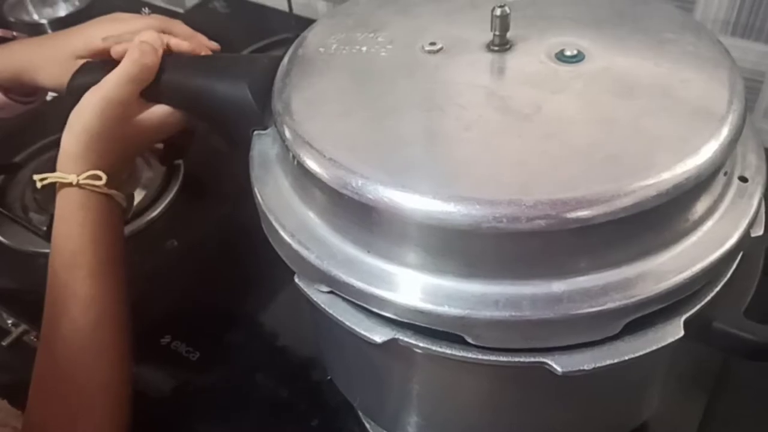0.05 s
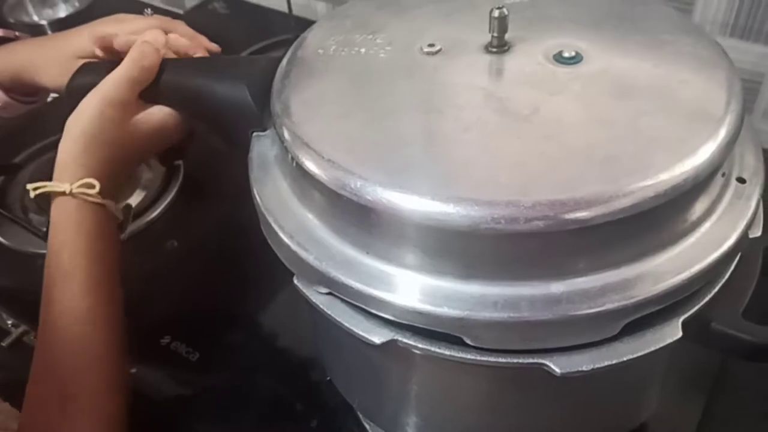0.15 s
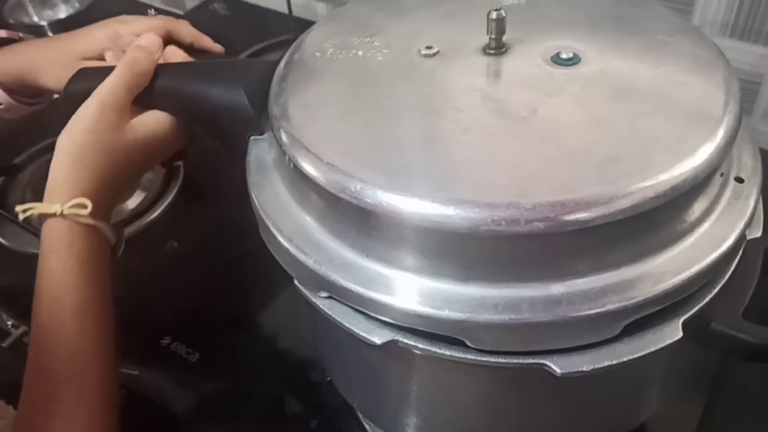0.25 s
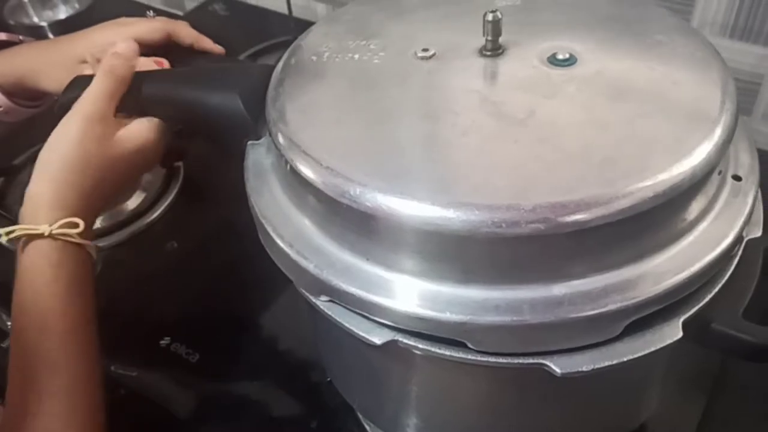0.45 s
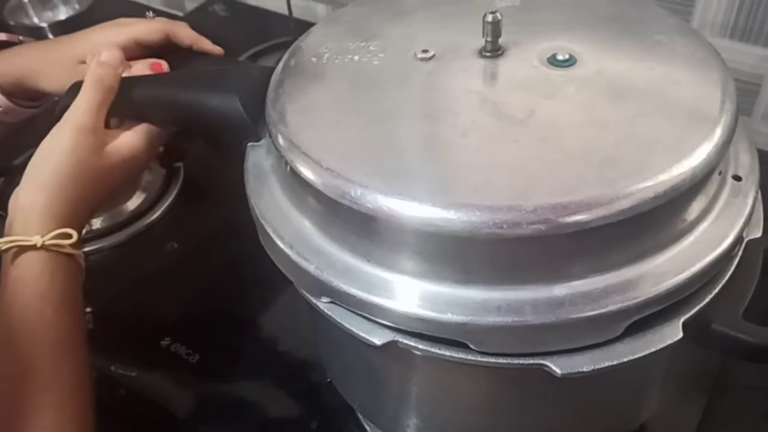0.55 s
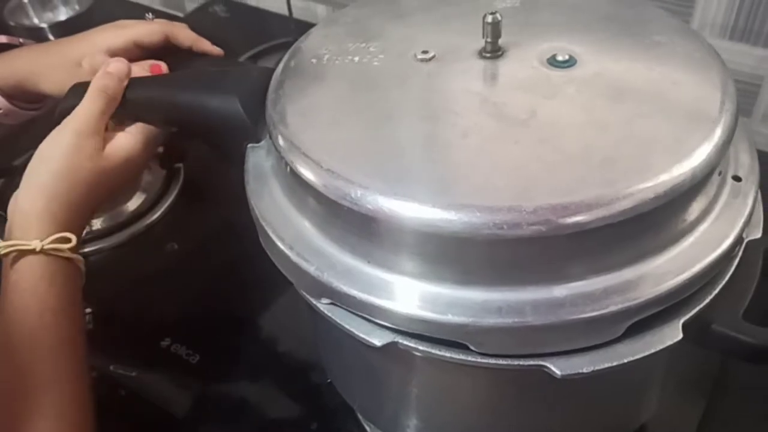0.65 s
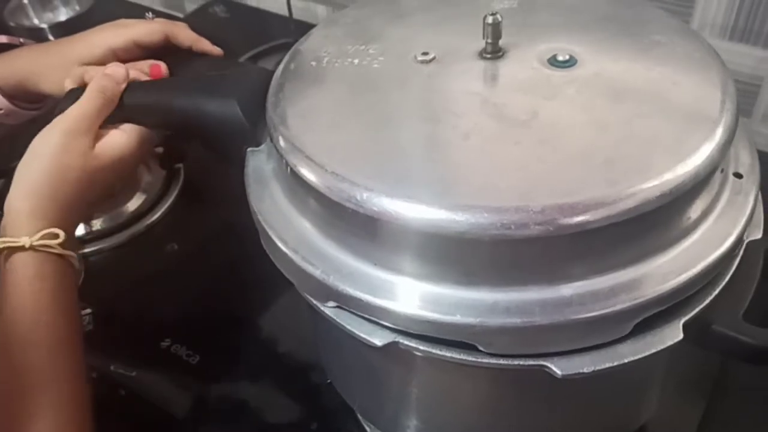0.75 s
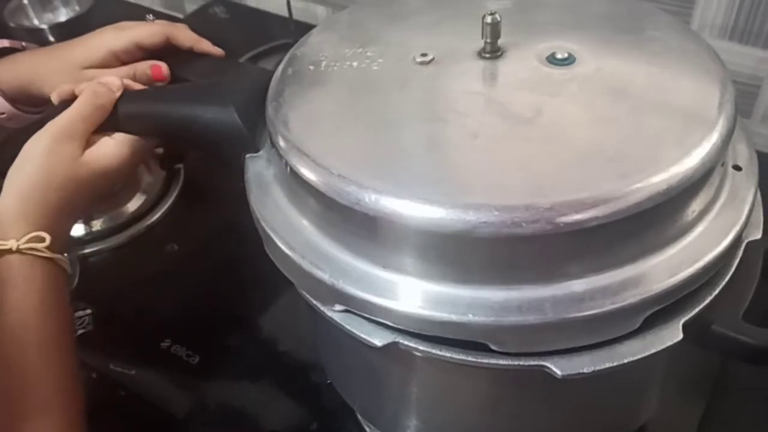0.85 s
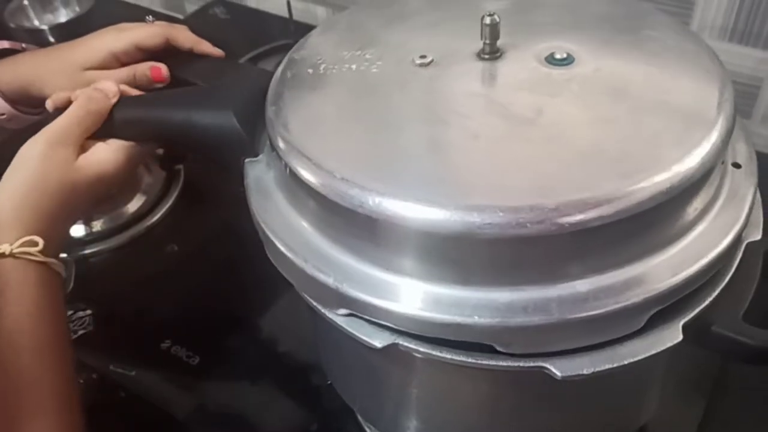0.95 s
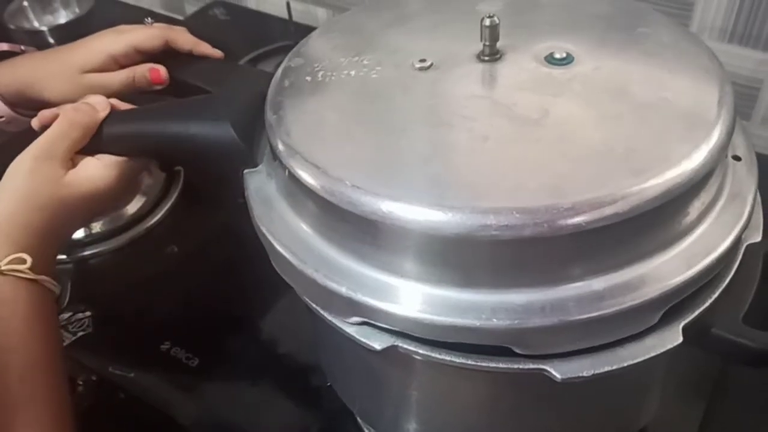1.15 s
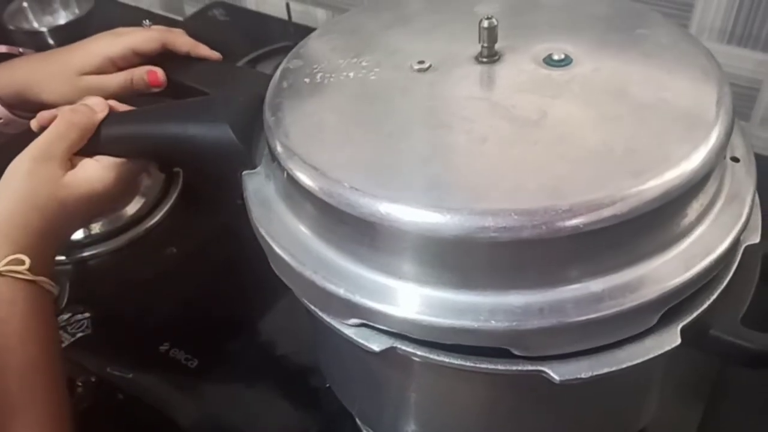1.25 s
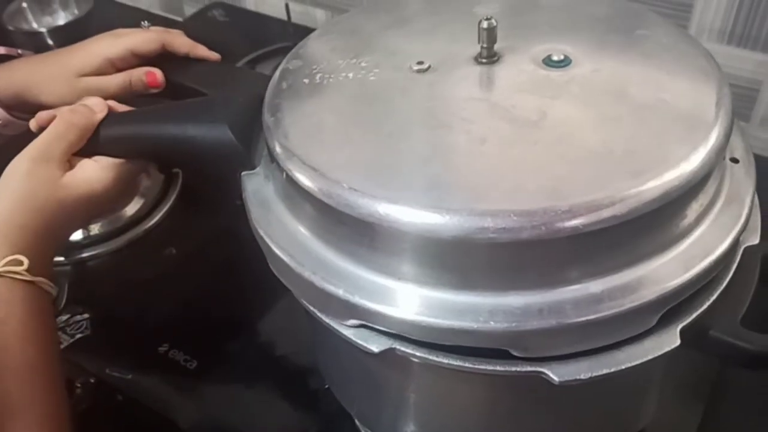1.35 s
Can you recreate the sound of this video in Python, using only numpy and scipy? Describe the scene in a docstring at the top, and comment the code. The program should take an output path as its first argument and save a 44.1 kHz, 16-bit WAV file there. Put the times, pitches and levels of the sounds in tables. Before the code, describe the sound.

A metal pressure cooker lid scrapes briefly and drops onto its pot with a loud, hollow clank. Faint rubbing, ticks and light knocks follow as it is twisted shut, heard close up in a small kitchen.

```python
"""A rim scrapes, then a loud clank: the aluminium lid of a pressure cooker drops into place on its pot.
As the lid is twisted shut, the gasket rubs, the lugs tick and knock, and the plastic handles meet.
Impacts and stick-slip friction excite the same resonator, the pot, which answers with a few hollow
low modes and a dense metallic shimmer that lingers in a small kitchen, over a faint steady hiss."""
import sys
import numpy as np
from scipy import signal
from scipy.fft import rfft, irfft
from scipy.io import wavfile

SR = 44100
rng = np.random.default_rng(int(sys.argv[2]) if len(sys.argv) > 2 else 0)


def file_out(sig):
    """Save sig as 16-bit WAV at sys.argv[1]."""
    # one column per channel
    cols = np.atleast_2d(sig).T
    # limit, then scale
    lim = np.clip(cols, -1, 1)
    pcm = np.round(lim * 32767).astype(np.int16)
    wavfile.write(sys.argv[1], SR, pcm)


N = 61739
T = np.arange(N) / SR

# The dense modes of pot and room. Each row: frequency in Hz, relative spectral level in dB, quick T60
# and lingering T60 in seconds, lingering share in dB, left minus right in dB, left-right correlation.
SHIMMER_BANDS = [(40, -36, 0.075, 0.27, -12, -4, 0.71), (122.4, -25.5, 0.09, 0.32, -16, 3, 0.47),
                 (210, 1.5, 0.5, 0.64, -9.5, 6.5, 1), (463, -5, 0.17, 0.66, -16, -2.5, 0.71),
                 (926, -4.5, .2, 0.77, -10, 0, 0.019), (2120, -17.5, 0.32, 0.99, -16, -1, 0),
                 (3740, -8, 0.24, 0.73, -12.5, -5, 0), (5090, -18, 0.064, 0.54, -16, 2.5, 0),
                 (7110, -4.5, 0.18, 0.42, -5.5, -6, 0.12), (8600, -16.5, 0.088, 0.22, -19, -0.5, 0.15),
                 (13100, -32.5, 0.15, .5, -10, -6.5, 0)]


def ringing(jerks):
    """Superposition of resonances: each distinct ring answers the contact force as a damped sinusoid."""
    # Modes of the closed pot and, last, a faint high ring at the lower edge of the treble notch.
    # Each row: frequency in Hz, relative level in dB, T60 in seconds, left minus right in dB.
    rings = [(173.2, -21.5, 0.5, -6), (207.3, -24.5, 0.89, 4), (259.1, -14, 0.33, -5),
             (275.8, -8.5, 0.15, 0.5), (312.2, -18, 0.35, 0), (398, -26.5, 0.3, 8), (454, -24, 0.25, 0.5),
             (479.4, -29.5, 0.34, -4.5), (650.4, -18.5, 0.12, 6), (849.7, -16, 0.22, 3.5),
             (872, -25.5, 0.27, 10), (911, -24, 0.23, 1), (1209, -23.5, 0.17, 8), (1227, -20.5, 0.19, 5.5),
             (1287.5, -25.5, 0.32, -8), (1449, -27.5, 0.18, -3.5), (2340, -29, 0.3, 2),
             (3013, -34.5, 0.4, 5.5), (3436, -28.5, 0.29, -14), (3667, -20.5, 0.18, -2),
             (4697, -26, 0.28, -1), (6170, -29.5, 0.22, -11), (6880, -28, 0.22, -12), (8470, -36, 0.21, -6)]
    seated_s, seated_loss_db, grip_hz = 0.91, 8, 1210  # pressed on the gasket, the lid loses upper modes
    waver_depth, waver_corner_hz = 0.8, 1470  # the loose lid makes the upper rings waver
    spread_rad, spread_hz = 1.38, 2350  # upper rings reach left and right out of step
    soft_jerks = jerks * from_db(-4)  # sliding excites these rings less than a blow does
    out = 0
    for k, (hz, db, t60, pan_db) in enumerate(rings):
        phase = (-1) ** k * np.array([[.5], [-.5]]) * spread_rad * min(hz / spread_hz, 1)
        build_up = 1 - np.exp(-T * hz)  # a blow takes about one cycle to spread round the rim
        ring = from_db(db) * np.sin(2 * np.pi * hz * T + phase) * dying(t60) * build_up
        grip = from_db(-seated_loss_db * (T > seated_s) * hz / (hz + grip_hz))
        unsteady = 1 + waver_depth * hz / (hz + waver_corner_hz) * waver()
        out = out + pan(pan_db) * unsteady * convolve(grip * contact_force(hz, soft_jerks), ring)
    radiation = signal.butter(2, 181, "high", fs=SR, output="sos")  # too small a pot for deep bass
    return signal.sosfilt(radiation, out)


def shimmer(jerks):
    """Modal overlap: countless close modes merge into noise with a crack, a quick decay and a long ring."""
    out = 0
    for hz, noise in noise_bands():
        db, quick_t60, slow_t60, slow_db, pan_db, _ = at_hz(SHIMMER_BANDS, hz)
        crack = from_db(1) * pan(-1) * dying(t60=0.072)  # direct sound of the touch
        decay = np.sqrt(crack ** 2 + dying(quick_t60) ** 2 + (from_db(slow_db) * dying(slow_t60)) ** 2)
        response = from_db(db - 43.5) * pan(pan_db) * noise * decay
        out = out + convolve(contact_force(hz, jerks), response)
    return out


def contact_force(hz, jerks):
    """Impact and friction: the drive at one frequency is the sliding rim plus an impulse per contact."""
    # Lid strikes pot. Each row: start in seconds, then boom, clank, ring and tick strengths in dB.
    contacts = [ (0.002, -35, -24, -32, -32), (0.092, -42, -23.5, -48, -55),
                (0.173, -23.5, -37, -43, -31.5), (0.205, -23, -44, -58, -56),
                (0.225, -9.5, -18.5, -39, -23.5), (0.235, -14, -10.5, -21, -23.5),
                (0.2559, -1, -0.5, -1, -1.5), (0.2636, -42, -4, -16, -9), (0.318, -15.5, -24.5, -38, -39),
                (0.430, -25.5, -28.5, -37, -46), (0.528, -29, -38, -38, -44),
                (0.630, -50, -32.5, -38, -52.5), (0.686, -23.5, -33, -51, -53),
                (0.728, -26, -40, -33.5, -22), (0.779, -23, -33.5, -53, -42), (0.796, -31, -36.5, -42, -39),
                (0.839, -26, -37, -50, -44), (0.958, -16.5, -21, -34.5, -33.5), (1.010, -21, -37, -55, -35),
                (1.029, -20.5, -29, -57, -25.5), (1.084, -24.5, -22, -24, -40)]
    # The frequencies in Hz at which those four strengths apply.
    colour_hz = [250, 900, 3300, 7000]
    # Gasket and rim slide. Each row: time in seconds, dull rubbing and gritty scraping in relative dB.
    slide = [(0, -19.5, -29.5), (0.14, -33, -39), (0.213, -38, -33), (0.234, -6.5, -14.5),
             (0.248, -26, -27), (0.35, -23.5, -27.5), (0.45, -26.5, -35.5), (0.64, -35, -44),
             (0.70, -23.5, -37), (0.79, -30.5, -32), (0.84, -34, -46), (0.92, -28.5, -37),
             (0.98, -39, -33.5), (1.04, -35, -28.5), (1.11, -31, -56), (1.19, -43, -51), (1.4, -70, -46)]
    rub_hz, grit_hz, friction_db = 383, 3270, -19
    times, rub_db, grit_db = np.transpose(slide)
    gritty = np.interp(np.log(hz), np.log([rub_hz, grit_hz]), [0, 1])
    force = jerks * from_db(friction_db + np.interp(T, times, rub_db + gritty * (grit_db - rub_db)))
    for start, *colour_db in contacts:
        force[int(start * SR)] += from_db(np.interp(np.log(hz), np.log(colour_hz), colour_db))
    return force


def slips(per_second=900, spread_db=2.5):
    """Stick-slip friction: tiny jerks of uneven size at random moments."""
    sizes = from_db(spread_db * np.minimum(rng.exponential(1, N), 4)) * rng.choice([-1, 1], N)
    return sizes * (rng.random(N) < per_second / SR)


def waver(bandwidth_hz=39):
    """Random amplitude modulation: a slow swell of unit standard deviation."""
    lowpass = signal.butter(2, bandwidth_hz, fs=SR, output="sos")
    slow = signal.sosfilt(lowpass, rng.standard_normal(N + SR // 4))[-N:]
    return slow / slow.std()


def gasket(resonance_hz=415, width_hz=88):
    """Friction-driven resonance: quick slips make the rubber ring groan as it is dragged round."""
    # Each row: time of the peak in seconds, Gaussian half length in seconds, level in dB.
    judders = [(0.701, .012, -40), (0.76, 0.039, -46.5), (0.805, 0.0066, -40.5)]
    edges = [resonance_hz - width_hz / 2, resonance_hz + width_hz / 2]
    groan = signal.sosfilt(signal.butter(2, edges, "band", fs=SR, output="sos"), slips())
    swells = sum(from_db(db) * np.exp(-.5 * ((T - peak) / half) ** 2) for peak, half, db in judders)
    return groan / groan.std() * swells


def handles(start_s=1.2, level_db=-37.5):
    """Damped free vibration: the two plastic handles meet with a short dry knock."""
    # Each row: frequency in Hz, relative level in dB, T60 in seconds, left minus right in dB.
    modes = [(610, -5, 0.087, 1), (852, 9, 0.048, 0.92), (1200, 1.5, 0.057, 1), (1545, -6, 0.098, 0.21),
             (2370, -4, 0.051, 0), (3440, -8, .05, -1), (4050, -16, 0.029, -1)]
    knock = sum(from_db(level_db + db) * pan(pan_db) * np.sin(2 * np.pi * hz * T) * dying(t60)
                for hz, db, t60, pan_db in modes)
    return np.pad(knock, ((0, 0), (int(start_s * SR), 0)))[:, :N]


def kitchen(direct, t60=0.34, echo_db=-13):
    """Reverberation: reflections from the walls add a short diffuse tail to the direct sound."""
    room = sum(noise for hz, noise in noise_bands()) * dying(t60)
    return direct + from_db(echo_db) * convolve(direct, room / np.sqrt(np.sum(room ** 2) / 2))


def air():
    """Ambient noise: the faint steady rumble and hiss of the kitchen."""
    # Each row: frequency in Hz, spectral level in dB per Hz.
    spectrum = [(30, -102), (55, -99), (90, -71.5), (140, -83), (220, -79), (500, -85), (1000, -89.5),
                (2000, -98), (3800, -101.5), (5400, -99), (6800, -96.5), (9000, -99), (13000, -100.5),
                (16000, -100)]
    out = 0
    for hz, noise in noise_bands():
        pan_db = 0.52 * at_hz(SHIMMER_BANDS, hz)[-2]  # leans about half as far as the shimmer
        out = out + from_db(at_hz(spectrum, hz)[0]) * pan(pan_db) * noise
    return out


def noise_bands():
    """Interaural coherence: yields (Hz, third-octave noise of unit power per Hz), alike in the bass."""
    edges = 28 * 2 ** (np.arange(29) / 3)
    for low, high in zip(edges, edges[1:]):
        hz = np.sqrt(low * high)
        band = signal.butter(2, [low, high], "band", fs=SR, output="sos")
        mid, side = signal.sosfilt(band, rng.standard_normal((2, N + SR // 4)))[:, -N:] * np.sqrt(SR / 2)
        alike = at_hz(SHIMMER_BANDS, hz)[-1]
        yield hz, (np.sqrt(1 + alike) * mid + np.sqrt(1 - alike) * side * [[1], [-1]]) / np.sqrt(2)


def from_db(db):
    """Amplitude ratio of a level in decibels."""
    return 10 ** (np.asarray(db) / 20)


def at_hz(rows, hz):
    """Interpolation of a table's columns along log frequency."""
    row_hz, *columns = np.transpose(rows)
    return [np.interp(np.log(hz), np.log(row_hz), column) for column in columns]


def dying(t60):
    """Exponential decay by 60 dB in t60 seconds."""
    return np.exp(-np.log(1000) * T / t60)


def pan(db):
    """Interaural level difference: two gains, the left db above the right."""
    return from_db(np.array([[db], [-db]]) / 2)


def convolve(x, response):
    """Linear filtering by a stereo impulse response."""
    return signal.fftconvolve(np.atleast_2d(x), response, axes=1)[:, :N]


def scene():
    """Superposition: the cooker and its reverberation add to the kitchen's ambient noise."""
    jerks = slips()
    return kitchen(ringing(jerks) + gasket() + handles()) + shimmer(jerks) + air()


def record(dry, cutoff_hz=15600):
    """Clipping and band limiting: the loudest peak is flattened, the treble notched, the top cut."""
    # The microphone is deaf in one treble band. Each row: frequency in Hz, gain in dB.
    notch = [(8450, 0), (8900, -20.5), (9900, -24), (11100, -22), (11600, -1.5)]
    gain = from_db(at_hz(notch, np.linspace(1, SR / 2, N + 1))[0])
    spectrum = rfft(np.clip(dry, -1, 1), 2 * N)
    notched = irfft(spectrum * gain)[:, :N]
    return signal.sosfilt(signal.ellip(10, .1, 70, cutoff_hz, fs=SR, output="sos"), notched)


dry = scene()
out = record(dry)
file_out(out)
```